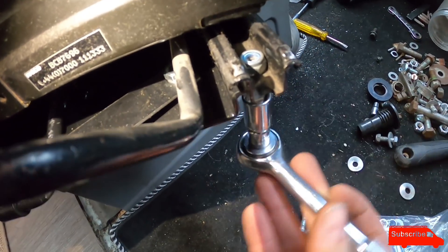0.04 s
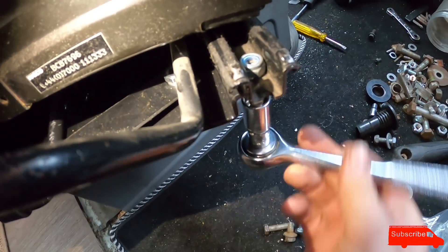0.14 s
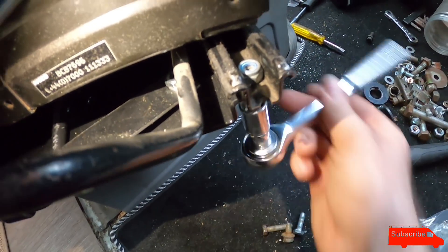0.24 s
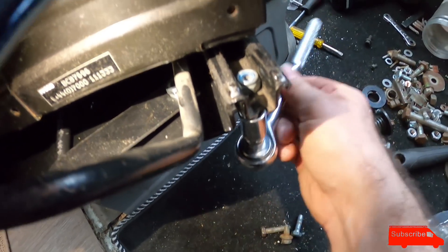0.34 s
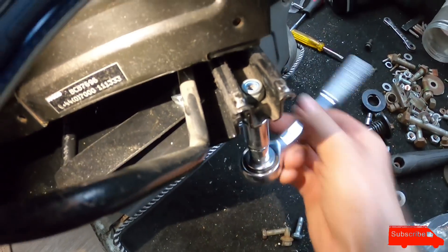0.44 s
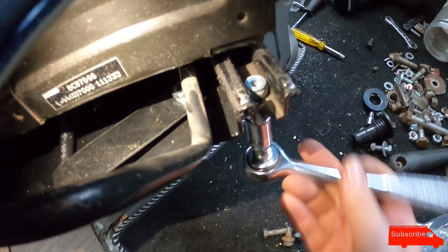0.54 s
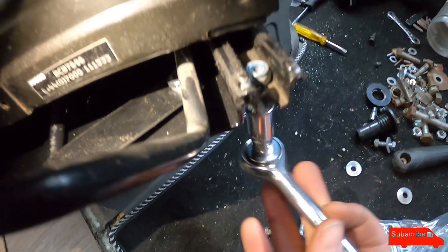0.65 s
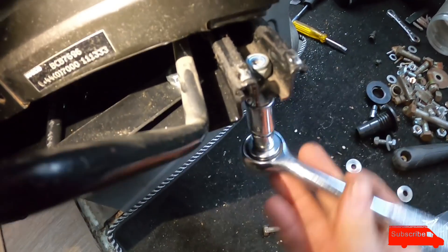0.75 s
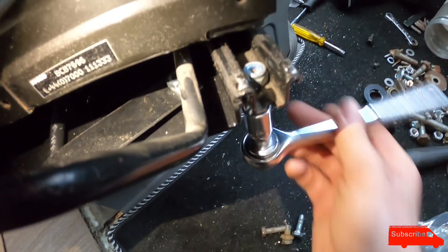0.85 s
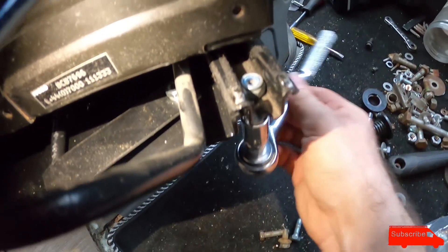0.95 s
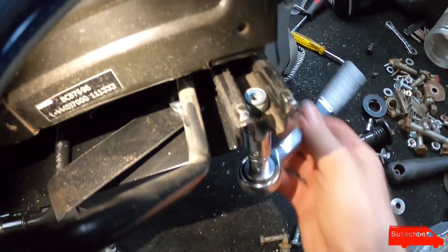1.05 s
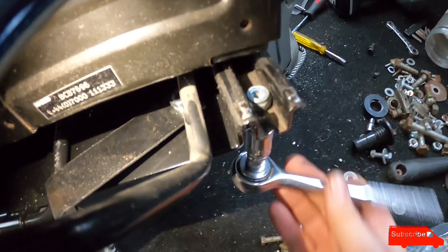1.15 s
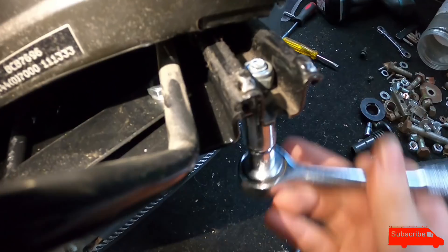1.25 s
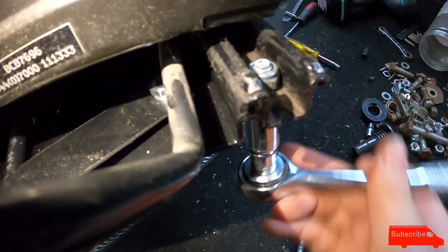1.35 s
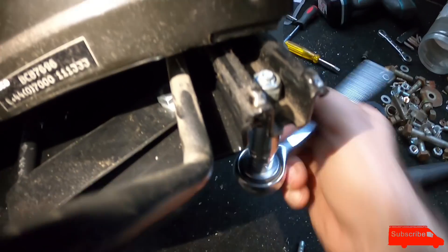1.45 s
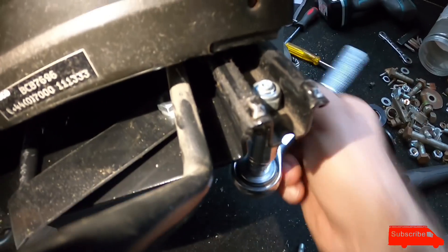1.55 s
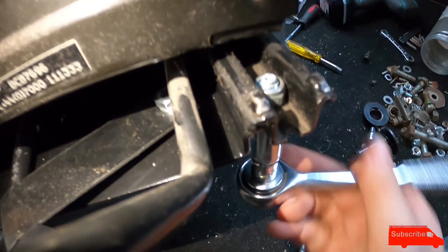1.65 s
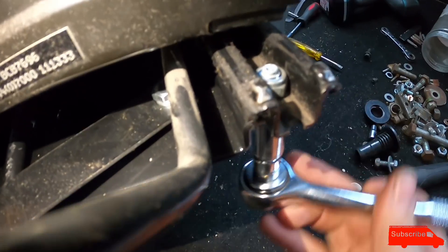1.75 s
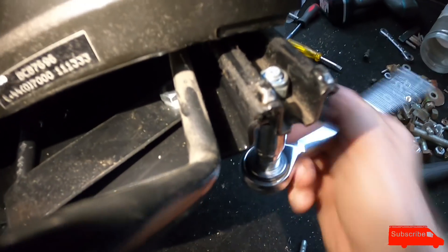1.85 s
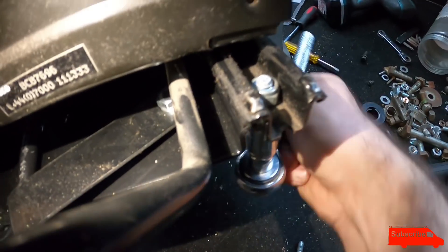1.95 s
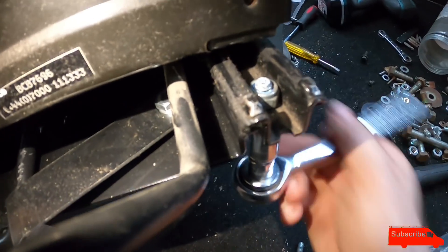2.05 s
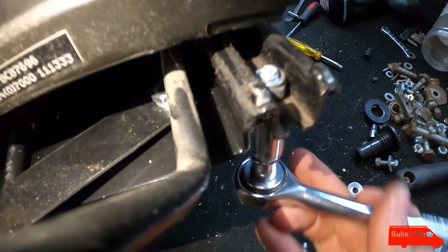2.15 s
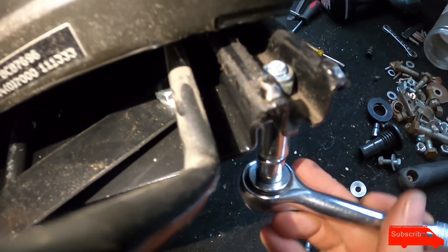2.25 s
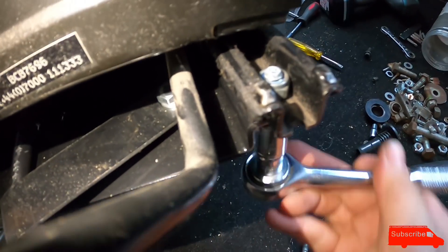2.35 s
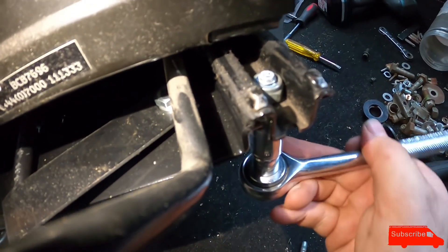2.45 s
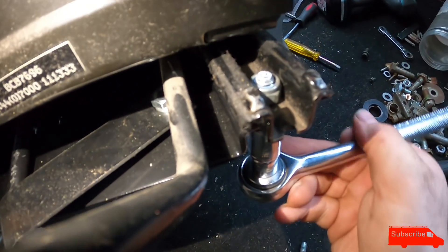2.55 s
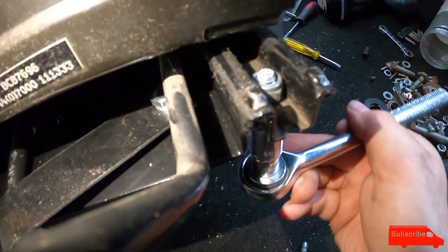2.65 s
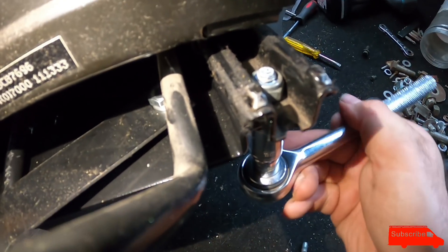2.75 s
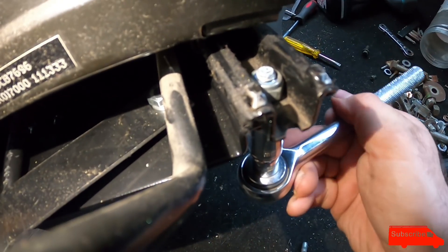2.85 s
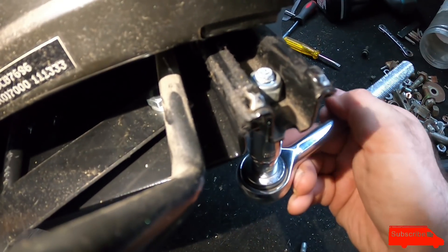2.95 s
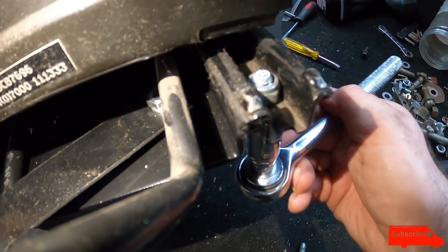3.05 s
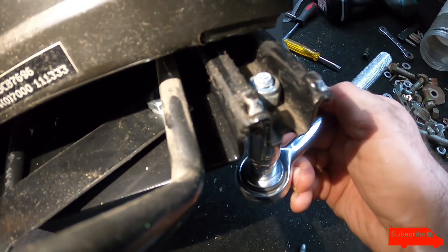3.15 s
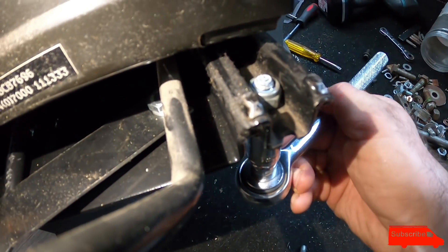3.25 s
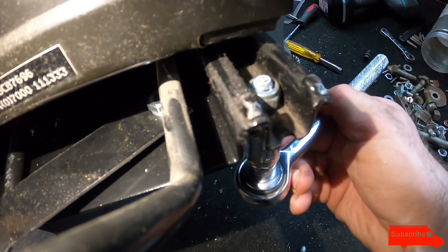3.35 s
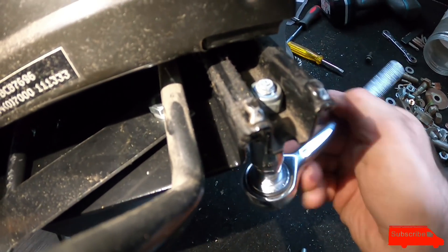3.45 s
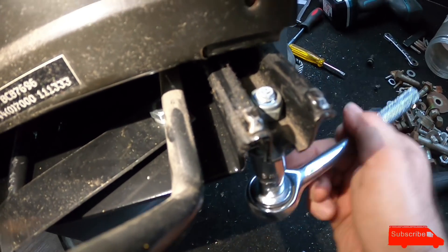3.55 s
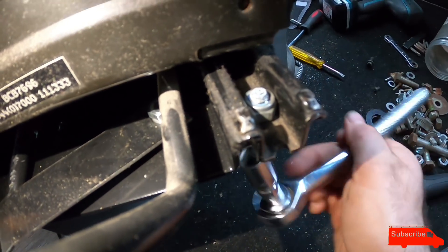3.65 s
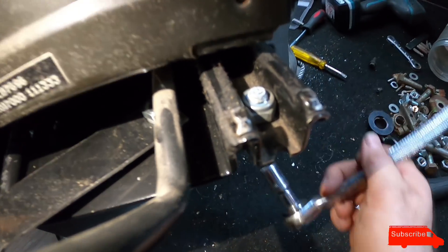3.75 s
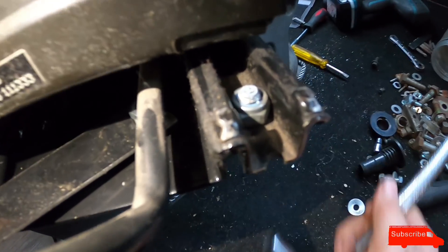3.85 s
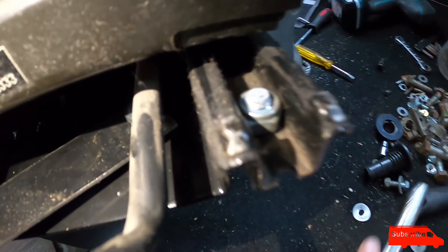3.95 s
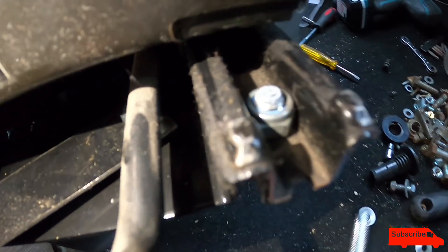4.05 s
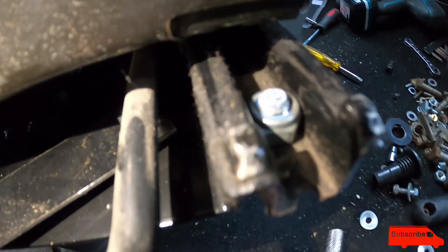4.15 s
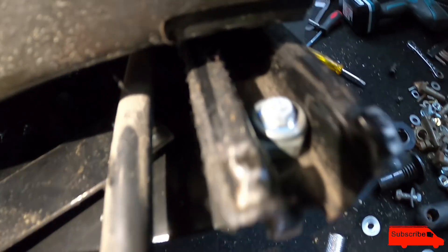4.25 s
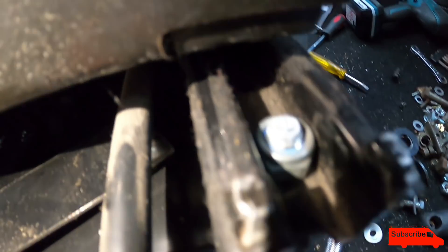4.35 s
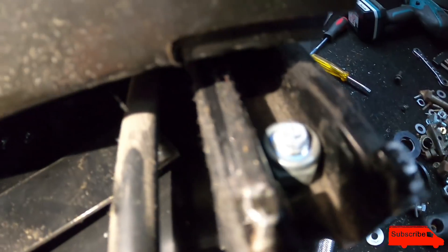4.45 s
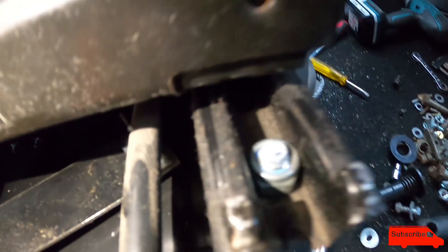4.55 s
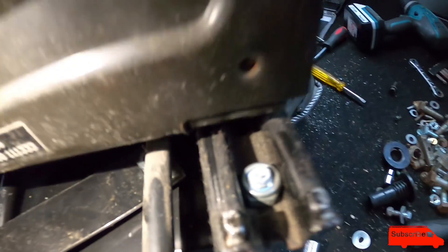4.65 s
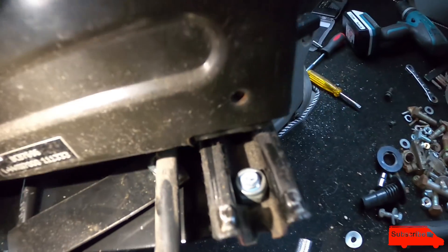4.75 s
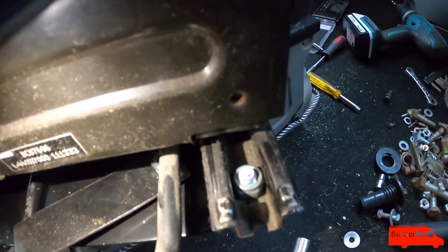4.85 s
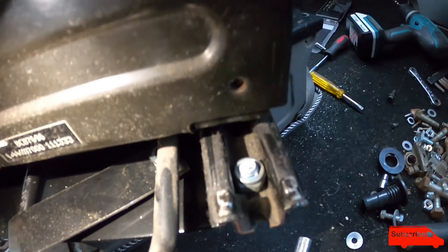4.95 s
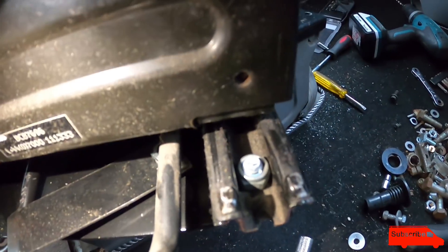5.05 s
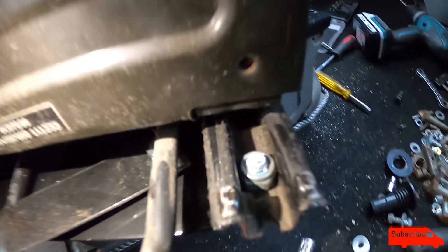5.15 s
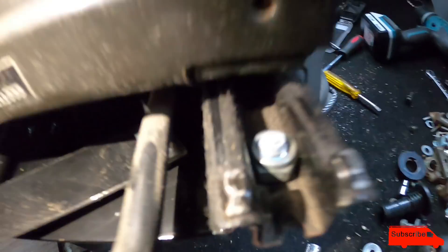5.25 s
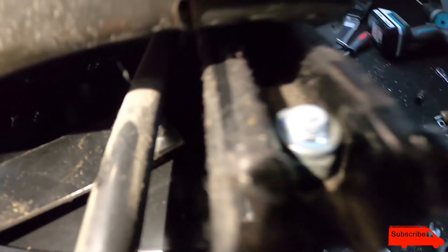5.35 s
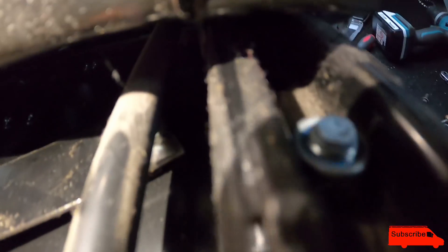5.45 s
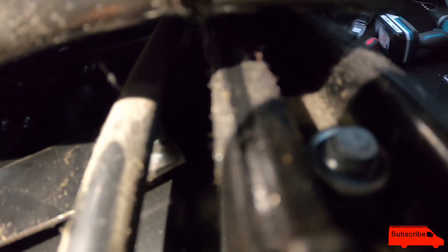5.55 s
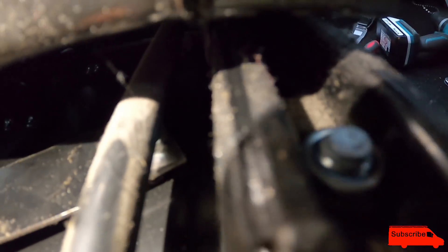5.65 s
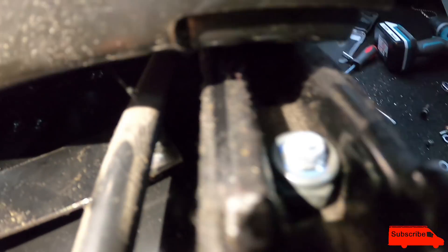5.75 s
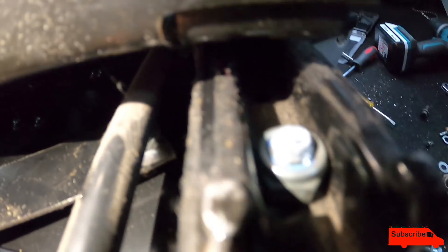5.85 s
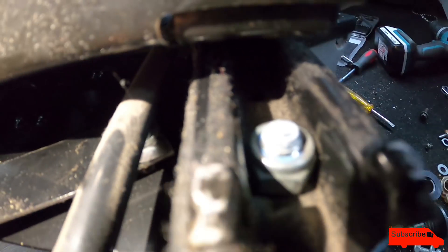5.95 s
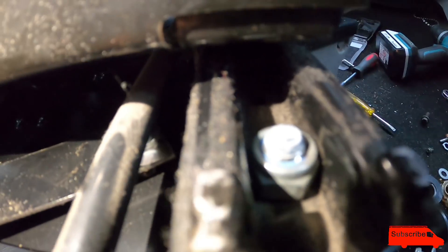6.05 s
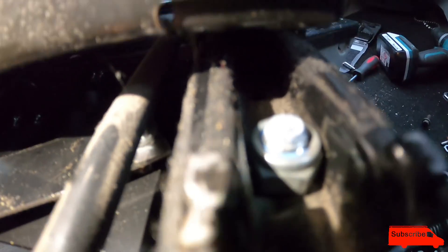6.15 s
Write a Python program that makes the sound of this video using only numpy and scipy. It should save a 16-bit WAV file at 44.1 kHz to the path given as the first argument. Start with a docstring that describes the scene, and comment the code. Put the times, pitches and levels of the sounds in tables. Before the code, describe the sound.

Four main strokes of a hand ratchet, each a rapid crisp zipping of clicks, alternate with knocks and creaky grinding of a metal seat frame. A pause follows, then a cluster of light clunks as the tool comes off, and sparse small ticks. Late on, fingers brush and tap the camera body. Close stereo pickup, tight cabin, faint low rumble and distant road noise.

```python
"""Inside a van, a hand ratchet tightens a bolt on a steel seat frame, close to a camera; a car passes outside.
On each back swing the pawl clicks: noise cracks followed by decaying sines, the modes of the steel parts. Play
in socket and bracket knocks the frame and floor pan, as do the hand's later bumps and tap: pushes of noise
through resonances. Tyre roar, cabin boom and a low rumble are coloured noises; the car's distance sets roar and
boom. A hand slides on the camera body (filtered noise) and taps it (a damped, falling sine and a tick)."""
import sys
import numpy as np
from scipy import signal
from scipy.fft import rfft, irfft, next_fast_len
from scipy.io import wavfile
from scipy.ndimage import uniform_filter1d, map_coordinates

SR = 44100
rng = np.random.default_rng(int(sys.argv[2]) if len(sys.argv) > 2 else 0)


def materialize(psi):
    """Save the field psi as 16-bit PCM at rate SR to the path in sys.argv[1].

    A 1-D psi becomes a single channel; in a 2-D psi each row is a channel.
    """
    bounded = np.clip(np.atleast_2d(psi).T, -1, 1)
    quanta = np.round(bounded * 32767).astype(np.int16)
    wavfile.write(sys.argv[1], SR, quanta)


N = 273420

# Spectral densities of tyre roar, low rumble and cabin boom. Columns: f/Hz, relative level/dB
TYRE_SPECTRUM = [(260, -44.5), (450, -12.5), (681, -8), (811, -2), (1080, 0), (1600, -10.5), (2510, -17.5),
                 (3790, -34.5), (7180, -44.5), (9000, -65.5), (11700, -92.5), (19800, -120)]
RUMBLE_SPECTRUM = [(12, -36.5), (20, -3.5), (48, 0), (64, -2.5), (81, -3.5), (110, -9), (140, -35.5),
                   (240, -120)]
BOOM_SPECTRUM = [(53, -30.5), (90, -12.5), (118, -4.5), (172, -0.5), (200, -13.5), (232, -6.5), (370, -22),
                 (415, -27.5), (500, -30), (650, -54), (1100, -120)]
# Course of the low rumble. Columns: t/s, level/dB
RUMBLE_LEVEL = [(0, -34), (.12, -54), (.3, -37), (.47, -60.5), (1.1, -50), (1.5, -36.5), (2.1, -37),
                (2.36, -49), (2.46, -39), (2.75, -39), (3.23, -43.5), (3.75, -38.5), (3.96, -50),
                (4.36, -50.5), (4.44, -37), (4.53, -60), (5.44, -48.5), (6.2, -60.5)]
# Decay of the cabin's reverberation. Columns: f/Hz, t60/s
CABIN_DECAY = [(150, 0.21), (1000, 0.16), (5000, 0.035), (12000, 0.015)]
# Resonances of the camera shell. Columns: f/Hz, width/Hz, relative level/dB
SHELL_MODES = [(1140, 68, -3), (1289, 99, -2), (2145, 170, -16.5), (2428, 140, -16), (2820, 430, -23.5)]
# Spectral density of skin hiss. Columns: f/Hz, relative level/dB
SKIN_SPECTRUM = [(1800, -12), (3000, -6.5), (3620, -9), (4420, -4), (5190, -5), (6260, -13), (7600, -10),
                 (8300, -14.5), (9500, -24), (12000, -45), (16000, -72)]
# Skin strokes. Columns: start t/s, end t/s, shell level/dB, hiss level/dB
STROKES = [(4.06, 4.221, -71.5, -67.5), (4.28, 4.335, -38, -57.5), (5.353, 5.63, -73.5, -73.5)]
# Fingertip and nail jog the shell. Columns: t/s, shell level/dB, hiss level/dB, t60/s
NAIL_CATCHES = [(5.383, -38, -50.5, 0.024), (5.695, -40, -73, 0.11)]
# One finger tap: t/s, thud level/dB, thud starting f/Hz, half length/s, tick level/dB, left-right level/dB
FINGER_TAP = (5.6945, -7.8, 370, .0025, -30, -9.5)
# Resonances of seat frame and floor pan. Columns: f/Hz, width/Hz, relative level/dB
FRAME_MODES = [(609, 79, -7), (907, 82, -4), (1061, 130, -2), (1277, 160, 1.5), (1576, 100, -2.5),
               (1816, 340, -4.5), (2540, 330, -10), (2900, 90, -4)]
PAN_MODES = [(133.4, 26, -4.5), (170, 38, 1), (294, 69, -6), (360, 85, -7.5), (490, 170, -14)]
# Spectral density of the sharp edges. Columns: f/Hz, relative level/dB
EDGE_SPECTRUM = [(1180, -38), (2000, -10), (2960, -1), (4300, -3.5), (5730, -10), (6470, -9.5), (9010, -25),
                 (12100, -37.5), (16000, -82)]
# Knocks on the frame; those from 4.2 s on come with the hand's bumps and tap on the camera. Columns: t/s, frame
# level/dB, floor pan level/dB, edge level/dB
KNOCKS = [(0.012, -29, -24.5, -43), (0.089, -43, -41, -61), (0.11, -37, -27.5, -53),
          (0.178, -17.5, -27, -37), (0.204, -38.5, -30, -37), (0.277, -56, -33.5, -57),
          (0.285, -34, -31, -43.5), (0.416, -41, -32.5, -48), (0.512, -29, -21, -44.5),
          (0.552, -21.5, -26, -30), (0.573, -31.5, -29, -30.5), (0.589, -32, -27, -21),
          (0.673, -17, -40, -22), (0.781, -30.5, -35.5, -28.5), (0.796, -18, -22.5, -22),
          (0.878, -28.5, -23.5, -43.5), (0.905, -32.5, -26, -38), (0.942, -30, -44, -41),
          (1.091, -32.5, -54.5, -49), (1.139, -20, -21, -30), (1.178, -16, -26.5, -26),
          (1.19, -14, -31, -31), (1.246, -12, -19.5, -21.5), (1.279, -21.5, -27, -29),
          (1.332, -20, -36, -16.5), (1.466, -23, -21, -40.5), (1.495, -23.5, -26.5, -28.5),
          (1.503, -16, -18.5, -26), (1.516, -21, -17.5, -31.5), (1.529, -23, -26, -25),
          (1.671, -14.5, -18, -18), (1.684, -12.5, -27.5, -17.5), (1.709, -22, -31, -41.5),
          (1.84, -22.5, -39.5, -24.5), (1.883, -18, -36.5, -34.5), (1.933, -15, -31.5, -31),
          (1.942, -13.5, -16.5, -15.5), (1.962, -23.5, -29, -24.5), (2.103, -9.5, -21, -16.5),
          (2.135, -14, -17, -22.5), (2.149, -43.5, -39, -34), (2.292, -18, -26.5, -28),
          (2.397, -46.5, -44, -45), (2.436, -30, -34, -45.5), (2.46, -27.5, -27, -33.5),
          (2.508, -30, -28.5, -34), (3.318, -52, -44.5, -67), (3.35, -49, -49, -68),
          (3.537, -26.5, -30.5, -48.5), (3.556, -24.5, -27, -42.5), (3.581, -26.5, -31.5, -36),
          (3.604, -35, -25, -56), (3.623, -24.5, -36, -37), (3.636, -32, -21.5, -53.5),
          (3.662, -23, -35, -35.5), (3.671, -16.5, -19, -29), (3.687, -31, -20, -53),
          (3.751, -22, -37, -28), (3.759, -22, -31, -24.5), (3.782, -31, -62, -69), (4.22, -45, -35.5, -67),
          (4.424, -48, -39, -52), (4.443, -43, -50.5, -50), (5.366, -54, -38.5, -77),
          (5.385, -54, -45.5, -71), (5.69, -36, -25.5, -68)]
# Rise time constant/s and decay t60/s of a knock's force. Columns: frame, floor pan, edges
KNOCK_RISE_S = (0.0038, 0.0046, 0.0024)
KNOCK_T60_S = (0.05, 0.096, 0.071)
# Load on the socket while the wrench sits on the bolt, two spells. Columns: t/s, level/dB
LOAD = [
    [(0, -58), (.3, -57), (.47, -62.5), (.6, -44.5), (.9, -54), (1.0, -57), (1.15, -61), (1.5, -46),
     (2.0, -46.5), (2.35, -61.5), (2.55, -60), (2.7, -64)],
    [(3.5, -82), (3.6, -43.5), (3.72, -50.5), (3.8, -56.5), (3.95, -71)],
]
# Shares of load and of grinding, relative level/dB. Columns: frame, floor pan, edges
LOAD_PARTS_DB = (-1, 7.5, -7)
GRIND_PARTS_DB = (-3, -9, -17)
# Back swings; as the grip shifts, each part's ring moves from first to middle to last click. Columns:
# start t/s, end t/s, grinding level/dB, then level over the crack/dB: socket x3, head x3, pawl x3,
# and the mean left-right level/dB
SWINGS = [(0, .03, -43, -21, -21.5, -20, -9, -14, -12, -13.5, -10, -10.5, -5.5),
          (.59, .79, -32.5, -16, -4, -19, -24.5, -10.5, -3, -18, -2.5, -16.5, -5.5),
          (1.209, 1.26, -30.5, -2.5, -3.5, -3, -10, -19, -20.5, -17.5, -12, -12.5, -6),
          (1.32, 1.42, -28, -18, -22, -12, -11, -6, -10.5, -24.5, -25.5, -17.5, -6.5),
          (1.72, 1.85, -33.5, -27.5, -17.5, -23, -6.5, -13.5, -20.5, -21.5, -16.5, -19, -5.5),
          (2.163, 2.32, -35, -17.5, -13, -23, -13.5, -19, -11.5, -4, -11, -15.5, -2.5)]
# A click outside a swing. Columns: level over the crack/dB of socket, head, pawl and whole wrench,
# mean left-right level/dB
LOOSE_CLICK_DB = (-16.5, -8.5, -32, -9, -5.5)
# Pawl clicks. Columns: t/s, reference level/dB for crack and ring
CLICKS = [(0.0137, -15.5), (0.2285, -50), (0.277, -50.5), (0.2847, -52), (0.5995, -20), (0.6114, -10),
          (0.6294, -12.5), (0.6426, -15.5), (0.6532, -16.5), (0.6654, -13.5), (0.6803, -21), (0.698, -13.5),
          (0.7177, -17.5), (0.7342, -14), (0.7516, -16), (0.7779, -18.5), (1.2097, -14), (1.2286, -13.5),
          (1.2439, -16.5), (1.3078, -13.5), (1.3248, -15), (1.3398, -15.5), (1.3531, -13.5), (1.3682, -18),
          (1.3827, -18), (1.4055, -15), (1.732, -14), (1.7484, -18), (1.7643, -16), (1.7819, -13.5),
          (1.7977, -12.5), (1.8161, -12), (1.8382, -11.5), (1.924, -32.5), (2.164, -13), (2.1802, -15.5),
          (2.1956, -14.5), (2.2106, -18), (2.2254, -15), (2.242, -14), (2.2567, -13), (2.2766, -14),
          (2.3076, -14.5), (3.6004, -40), (3.823, -54), (3.8345, -38), (3.8751, -27.5), (3.8899, -48),
          (4.0562, -55.5), (4.1829, -50.5)]
# Ratchet modes. Columns: mean f/Hz, mean relative level/dB, t60/s, the part that rings
STEEL_MODES = [(3980, 2, 0.059, "socket"), (4070, -8.5, .03, "socket"), (5130, -10, .03, "head"),
               (6404, -5, 0.04, "socket"), (7390, 5, 0.032, "head"), (7540, -4.5, 0.055, "pawl"),
               (9680, 6, 0.019, "pawl"), (11650, -19, 0.032, "all"), (12040, -8.5, 0.032, "pawl"),
               (14900, -28, .045, "all"), (15360, -30.5, .03, "all")]
# Spectral density of the crack. Columns: f/Hz, relative level/dB
CRACK_SPECTRUM = [(1500, -23.5), (3000, 2.5), (6000, -1), (8000, 2), (10500, -12.5), (12000, -13),
                  (13500, -25), (14600, -22.5), (16000, -34.5)]

# The passing car: time of nearest approach, distance then, speed
PASS_S, NEAREST_M, SPEED_M_S = 2.4, 5.87, 18.9
# Level at the nearest point, loss per doubling of distance
TYRE_DB, TYRE_LOSS_DB, BOOM_DB, BOOM_LOSS_DB = -45, 7.5, -45.5, 4.5
FAR_TYRE_DB, STILL_BOOM_DB = -71, -60  # steady far traffic
ROCK_DB, ROCK_S = -6.5, 0.04  # knocks rock the van: level over the pan push, smoothing time
STROKE_RISE_DB_S, SHELL_FALL_DB_S, HISS_FALL_DB_S = 399.5, 114, 56  # slopes in dB/s
GRIND_RISE_DB_S, GRIND_FALL_DB_S = 302, 251
RING_SCATTER_DB = 0  # spread of each part's ring from click to click: none
TOP_HZ = 16500  # band limit


def amp(db):
    """Decibel law: amplitude gain of a level in dB."""
    return 10 ** (np.asarray(db) / 20)


def unit(x):
    """Normalisation of power: x scaled to rms 1."""
    return x / np.sqrt(np.mean(x ** 2) + 1e-20)


def along(points, hz):
    """Interpolation of (f, value) points on a logarithmic frequency axis."""
    f, value = np.transpose(points)
    return np.interp(np.log(hz + 1), np.log(f + 1), value)


def gains(*tables):
    """Envelopes linear in dB, one per level column; silent outside the tables, with soft ends."""
    t = np.arange(N) / SR
    hard = 0
    for rows in tables:
        times, *levels = np.transpose(rows)
        hard = hard + amp([np.interp(t, times, level, -150, -150) for level in levels])
    return abs(uniform_filter1d(hard, size=300, mode="nearest"))


def held(start, end, db, rise_db_s, fall_db_s):
    """Exponential growth to a level, held from start to end, then exponential decay."""
    t = np.arange(N) / SR
    early = np.clip(start - t, 0, None)
    late = np.clip(t - end, 0, None)
    return amp(db - rise_db_s * early - fall_db_s * late)


def wobble(rate):
    """Band-limited random modulation: a smooth curve through rate random knots a second."""
    knots = rng.standard_normal(int(N * rate / SR) + 4)
    return map_coordinates(knots, [np.arange(N) * rate / SR])


def filtered(x, response):
    """Linear filtering: the spectrum of x times a complex response of frequency."""
    m = next_fast_len(N + SR // 2)
    return irfft(rfft(x, m) * response(np.fft.rfftfreq(m, 1 / SR)), m)[..., :N]


def resonant(peaks, top_hz):
    """Modal superposition: causal damped resonances, rolled off above top_hz; white noise keeps its rms."""
    def response(f):
        total = 0
        for k, (centre, width, db) in enumerate(peaks):
            damping = 1j * f * width
            sign = (-1) ** k  # neighbouring modes have opposite signs
            total = total + sign * amp(db) * damping / (centre * centre - f * f + damping)
        total = total / (1 + 1j * f / top_hz) ** 2
        return total / np.sqrt(np.mean(abs(total) ** 2))
    return response


def coloured(points):
    """Spectral shaping by an (f/Hz, level/dB) curve; white noise keeps its rms."""
    return lambda f: unit(amp(along(points, f)))


def pair(alike):
    """Partial coherence: two noises whose correlation is alike."""
    turn = np.arccos(np.clip(alike, -1, 1)) / 2
    a, b = rng.standard_normal((2, N))
    shared, opposed = np.cos(turn) * a, np.sin(turn) * b
    return np.array([shared + opposed, shared - opposed])


def sides(db):
    """Interchannel level difference: left and right gains, left louder by db."""
    return amp([[db / 2], [-db / 2]])


def outside():
    """Spreading loss: tyre roar and cabin boom swell as the car nears; a low rumble joins the van's rocking."""
    travelled = SPEED_M_S * (np.arange(N) / SR - PASS_S)
    doublings = np.log2(np.hypot(1, travelled / NEAREST_M))
    tyre = np.hypot(amp(TYRE_DB - TYRE_LOSS_DB * doublings), amp(FAR_TYRE_DB))
    boom = np.hypot(amp(BOOM_DB - BOOM_LOSS_DB * doublings), amp(STILL_BOOM_DB))
    pan_push = pushes()[1]
    rock = amp(ROCK_DB) * abs(uniform_filter1d(pan_push, round(ROCK_S * SR)))
    rumble = np.hypot(gains(RUMBLE_LEVEL), rock)
    return (tyre * amp(1.2 * wobble(14)) * filtered(pair(0.61), coloured(TYRE_SPECTRUM))
            + rumble * amp(0.5 * wobble(12)) * filtered(pair(1.0), coloured(RUMBLE_SPECTRUM))
            + boom * amp(1.8 * wobble(14)) * filtered(pair(0.85), coloured(BOOM_SPECTRUM)))


def cabin(x, wet_db):
    """Reverberation: each frequency decays at its own rate; the bass is alike at both ports."""
    hz, t, (common, opposed) = signal.stft(rng.standard_normal((2, SR // 2)), SR, nperseg=256)
    opposed *= np.clip(hz / 2500, 0.15, 1)[:, None]
    decay = amp(-60 * t / along(CABIN_DECAY, hz)[:, None])
    tail = signal.istft(np.array([common + opposed, common - opposed]) * decay, SR, nperseg=256)[1]
    tail = tail / np.linalg.norm(tail[0])
    delayed = np.pad(x.mean(0), (100, 0))[None]  # 100 samples
    return x + amp(wet_db) * signal.fftconvolve(delayed, tail, axes=1)[:, :N]


def slide():
    """Friction excitation: sliding skin drives the camera shell near the left port and hisses."""
    shell = sum(held(start, end, db, STROKE_RISE_DB_S, SHELL_FALL_DB_S) for start, end, db, _ in STROKES)
    skin = sum(held(start, end, db, STROKE_RISE_DB_S, HISS_FALL_DB_S) for start, end, _, db in STROKES)
    for when, shell_db, hiss_db, t60 in NAIL_CATCHES:
        since = np.arange(N) / SR - when
        catch = (since > 0) * amp(-60 * np.clip(since, 0, 1) / t60)
        shell = shell + amp(shell_db) * catch
        skin = skin + amp(hiss_db) * catch
    modes = resonant(SHELL_MODES, top_hz=6000)

    def radiated(f):
        """Radiation efficiency: the small shell radiates little bass."""
        return modes(f) * (1j * f / 900 / (1 + 1j * f / 900)) ** 2

    return (filtered(shell * pair(0.36), radiated) * sides(7)
            + filtered(skin * pair(0.3), coloured(SKIN_SPECTRUM)) * sides(2.0))


def tap():
    """Soft impact near the right port: the fingertip flattens, so the push swells, falls in pitch and is damped."""
    s, thud_db, thud_hz, half, tick_db, pan_db = FINGER_TAP
    t = np.arange(N) / SR - s
    swell = (t > 0) * np.exp(-((t - 1.3 * half) / half) ** 2 / 2)
    thud = amp(thud_db) * swell * np.sin(2 * np.pi * thud_hz * (t - 55 * t * t))
    nail = np.clip(t + 0.0007, 0, 0.05)  # the nail lands 0.7 ms ahead
    tick = amp(tick_db - 60 * nail / 0.005) * np.sin(2 * np.pi * 7500 * nail)
    return sides(pan_db) * (thud + tick)


def pushes():
    """Impulsive force: each knock rises and decays exponentially on frame, floor pan and edges."""
    push, t = np.zeros((3, N + SR)), np.arange(SR // 5) / SR
    t60, rise = np.array(KNOCK_T60_S)[:, None], np.array(KNOCK_RISE_S)[:, None]
    shape = amp(-60 * t / t60) * (1 - np.exp(-t / rise))
    for s, db, pan_db, edge_db in KNOCKS:
        push[:, round(s * SR):][:, :len(t)] += amp([[db], [pan_db], [edge_db]]) * shape
    return push[:, :N]


def frame():
    """Forced vibration: rough knocks and grainy grinding shake frame, floor pan and sharp edges."""
    swing = sum(held(start, end, db, GRIND_RISE_DB_S, GRIND_FALL_DB_S) for start, end, db, *_ in SWINGS)
    grind = amp(GRIND_PARTS_DB)[:, None] * swing + amp(LOAD_PARTS_DB)[:, None] * gains(*LOAD)
    # loose parts rattle: the push comes in lumps
    rattle = unit(amp(0.67 * wobble(250)))
    grain = unit(amp(2.8 * wobble(60) + 2.1 * wobble(300)))
    steel, pan, edge = np.hypot(pushes() * rattle, grind * grain)
    return (filtered(steel * pair(0.89), resonant(FRAME_MODES, top_hz=3500)) * sides(1.5)
            + filtered(pan * pair(0.98), resonant(PAN_MODES, top_hz=600.4)) * sides(-0.8)
            + filtered(edge * pair(0.8), coloured(EDGE_SPECTRUM)) * sides(-0.5))


def ring_levels(s):
    """Modal participation: ring of each part over the crack, and the side, for a click at s."""
    socket, head, tooth, whole, pan_db = LOOSE_CLICK_DB
    for start, end, _, *levels, side_db in SWINGS:
        if start <= s <= end:
            knots = [start, (start + end) / 2, end]
            socket, head, tooth = (np.interp(s, knots, part) for part in np.split(np.array(levels), 3))
            whole, pan_db = 0, side_db
    part_db = [socket, head, tooth, whole] + rng.normal(0, RING_SCATTER_DB, size=4)
    return dict(zip(["socket", "head", "pawl", "all"], part_db)), pan_db


def pawl():
    """Impact and free vibration: each drop of the pawl cracks, then rings the modes of the steel parts."""
    rings, cracks, t = np.zeros((2, N + SR)), np.zeros((2, N + SR)), np.arange(SR // 10) / SR
    onset = 1 - np.exp(-t / 0.00023)
    crack_decay = amp(-16 - 60 * t / 0.0061) + amp(-11.5 - 60 * t / 0.036)
    for s, click_db in CLICKS:
        part_db, pan_db = ring_levels(s)
        pan_db += rng.normal(0, 4.1)
        at = round(s * SR)
        for hz, db, t60, part in STEEL_MODES:
            drift = np.cumsum(rng.normal(0, hz * 7.5e-6, len(t)))
            pitch = hz * rng.normal(1, 0.003)
            phases = rng.normal(0, 0.95, (2, 1))  # each port has its own
            wave = np.sin(2 * np.pi * pitch * t + drift + phases)
            mode_db = click_db + part_db[part] + db + rng.normal(0, 1.1)
            level = amp(mode_db - 60 * t / t60) * onset
            rings[:, at:][:, :len(t)] += sides(pan_db) * level * wave
        cracks[:, at:][:, :len(t)] += sides(pan_db) * amp(click_db) * crack_decay
    # the pawl chatters on the tooth: crack and ring are rough
    chatter = unit(amp(2.5 * wobble(350)))
    rough_ring = rings[:, :N] * unit(amp(1.5 * wobble(250)))
    return rough_ring + filtered(cracks[:, :N] * chatter * pair(0.5), coloured(CRACK_SPECTRUM))


def scene():
    """Superposition of all sources at the two ports; the wrench is a little nearer the right one."""
    work = cabin(pawl() + frame(), wet_db=-8.0)
    work[0] = np.roll(work[0], 1)  # left arrives one sample later
    touch = cabin(slide() + tap(), wet_db=-14.0)
    return work + touch + outside()


def record(dry):
    """Transducer noise and band limiting: a faint microphone hiss; nothing is kept from TOP_HZ up."""
    hiss_spectrum = [(1000, 0.5), (8000, -2.0), (10000, -18.5), (16000, -25.5)]  # f/Hz, relative level/dB
    hiss = amp(-83) * filtered(pair(0.1), coloured(hiss_spectrum))
    return filtered(dry + hiss, lambda hz: hz < TOP_HZ)


dry = scene()
out = record(dry)
materialize(out)
```